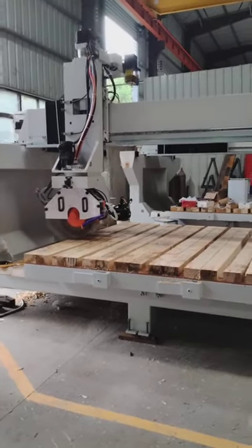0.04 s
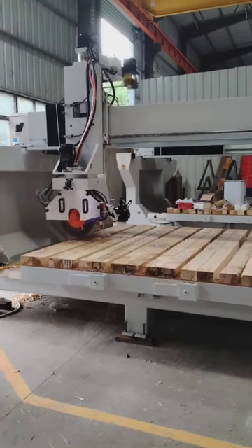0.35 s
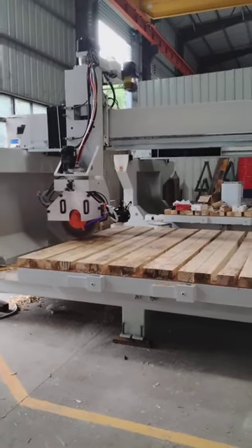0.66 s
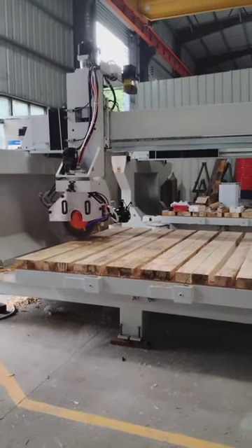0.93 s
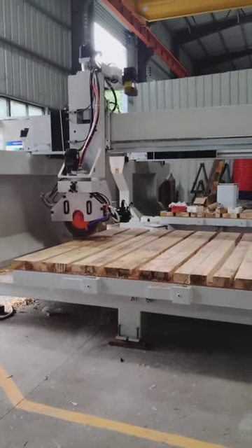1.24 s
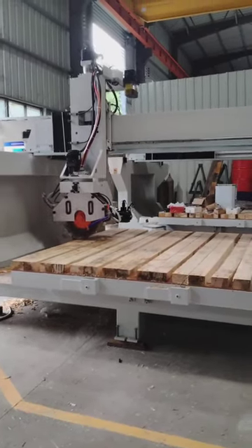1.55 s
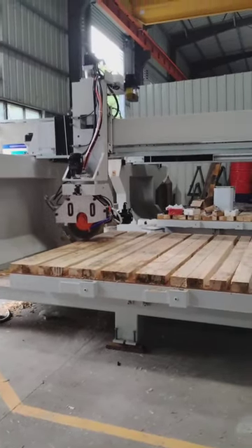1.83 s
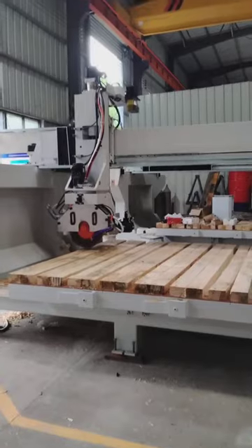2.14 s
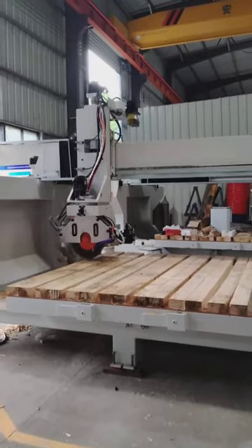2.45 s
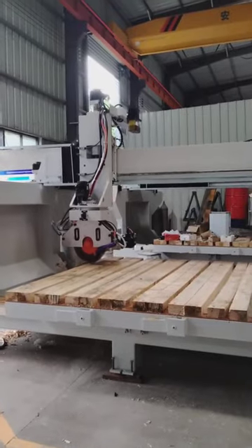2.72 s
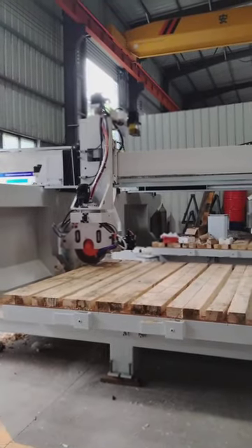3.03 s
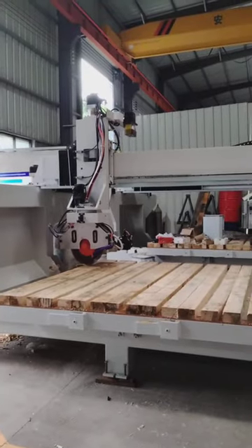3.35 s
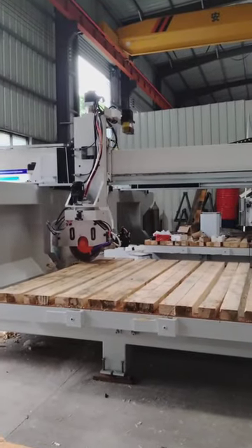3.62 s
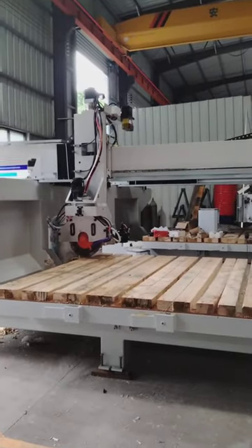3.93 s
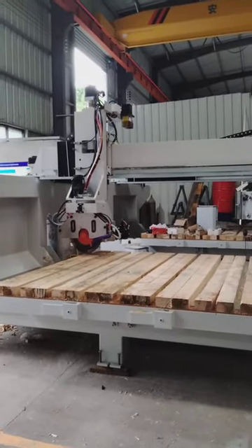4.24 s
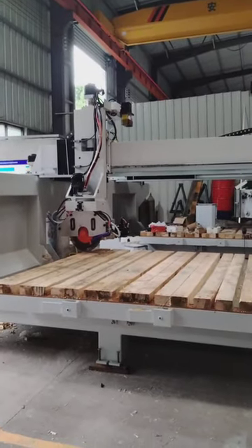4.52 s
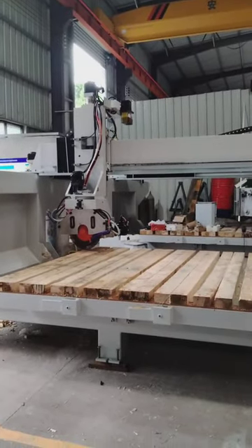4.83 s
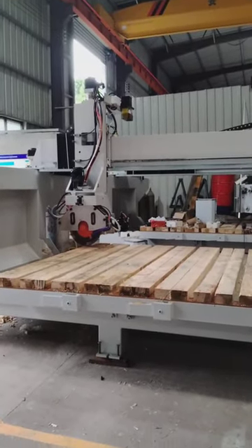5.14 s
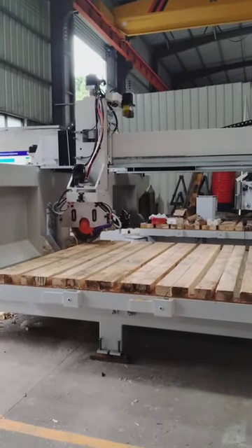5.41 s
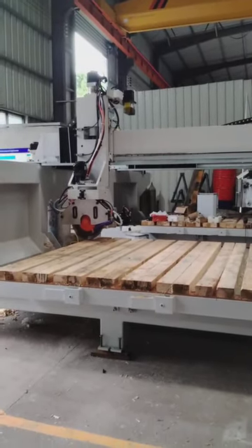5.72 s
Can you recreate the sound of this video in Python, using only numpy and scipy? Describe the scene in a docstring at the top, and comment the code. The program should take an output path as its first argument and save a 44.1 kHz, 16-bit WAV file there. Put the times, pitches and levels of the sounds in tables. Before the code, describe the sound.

A high electric whine, a ringing steel whir and broad hissing air come from a big saw spinning without cutting. The whine wavers quickly at first, then more slowly as the microphone, a few steps away, moves and settles. Early on a deep, distant thud reverberates through the factory hall and the hiss drops a little. A faint low rumble and hum continue throughout.

```python
"""A high, wavering whine, a steady whir and hissing air: a stone bridge saw idles in a large factory hall. The
inverter-fed motor whines in lines whole supply steps apart; its random switching rings the stator into a whir.
The lines fade and swell as the listener, a few steps away, moves slowly through the hall's standing waves. The
hiss eases after the first second, as something heavy thuds far off. The hall hums and rumbles behind."""
import sys
import numpy as np
from scipy import signal
from scipy.fft import rfft, irfft
from scipy.io import wavfile

SR = 44100
rng = np.random.default_rng(int(sys.argv[2]) if len(sys.argv) > 2 else 0)


def unload_audio(sound):
    """Save the sound as a 16-bit wav file, at the path given as the first command line argument."""
    columns = np.transpose(np.atleast_2d(sound))
    # keep every value between -1 and 1, then stretch to whole-number steps
    steps = np.round(np.clip(columns, -1, 1) * 32767)
    wavfile.write(sys.argv[1], SR, steps.astype(np.int16))


N = 254456
T = np.arange(N) / SR
BINS_HZ = np.maximum(np.arange(N // 2 + 1) * SR / N, 1)

CARRIER_HZ, SUPPLY_HZ = 2662.9, 50
LOWER_WHINE_HZ, UPPER_WHINE_HZ = CARRIER_HZ - 5 * SUPPLY_HZ, CARRIER_HZ + 5 * SUPPLY_HZ
LOWER_WHINE_GAIN_DB, UPPER_WHINE_GAIN_DB = 0.2, -0.5
WHIR_DB, WHIR_FLUTTER_DB, WHIR_FLUTTER_HZ = -21.5, 1.12, 22
AIR_FLUTTER_DB, AIR_FLUTTER_HZ = 0.55, 26
RUSH_DB, RUSH_FLOW_SHARE = -39, 0.26
HISS_GAIN_DB, SIZZLE_GAIN_DB, SIZZLE_DB_PER_S = -0.44, -8, -0.03
THUD_S, REVERB_LAG_S = 0.945, 0.07
LOW_DRONE_HZ, HIGH_DRONE_HZ = 302, 899.7
RUMBLE_GAIN_DB, LOW_DRONE_GAIN_DB, HIGH_DRONE_GAIN_DB = 4, 2, 1.5

# Listener steps about, then almost stops. Each row: time in seconds, pace from 0 to 1.
LISTENER_PACE = [(2.6, 1), (4.3, 0.25)]
# Standing-wave crests and nulls of the upper whine. Each row: time in seconds, relative level in dB.
UPPER_WHINE_DB = [(0.02, -29), (0.08, -52), (0.14, -27), (0.27, -27.5), (0.42, -20), (0.5, -22),
                  (0.58, -52), (0.65, -21.5), (0.77, -21), (0.9, -52), (1.01, -28.5), (1.09, -52),
                  (1.15, -48), (1.24, -22), (1.38, -52), (1.52, -29), (1.61, -52), (1.75, -22.8),
                  (2.02, -48), (2.18, -34), (2.28, -48), (2.39, -29), (2.6, -39), (2.72, -35), (2.86, -26),
                  (2.98, -31), (3.11, -27.5), (3.28, -48), (3.65, -23.5), (3.8, -21.3), (3.98, -26.5),
                  (4.09, -44), (4.21, -27), (4.37, -56), (4.55, -29.5), (5.0, -26), (5.35, -25.5),
                  (5.7, -27)]
# Lower whine, fading and growing stronger. Each row: time in seconds, relative level in dB.
LOWER_WHINE_DB = [(0.05, -30), (0.2, -39), (0.38, -29), (0.55, -42), (0.68, -30), (0.84, -44), (0.97, -29),
                  (1.07, -27.5), (1.15, -38), (1.42, -24), (1.6, -32), (1.98, -41), (2.3, -31),
                  (2.48, -23.5), (2.71, -32), (2.98, -28), (3.25, -20), (3.42, -26), (3.9, -25),
                  (4.28, -22.5), (4.55, -25), (4.66, -19.8), (4.85, -24), (4.97, -21.3), (5.15, -22.3),
                  (5.28, -29), (5.42, -21.5), (5.55, -24.5), (5.67, -20), (5.76, -27)]
# Weaker motor lines. Each row: carrier multiple, offset in supply steps, start and end levels in dB.
MOTOR_SIDEBANDS = [(1, -13, -52, -41.5), (1, -3, -52, -43), (1, -2, -39, -32), (1, 0, -38, -53),
                   (1, 2, -50, -47), (1, 3, -39.5, -55), (2, -19, -61, -62), (2, -14, -52, -45.5),
                   (2, -2, -56, -48.3), (2, 3, -59, -53)]
# Stator resonances. Each row: centre in Hz, width in Hz, relative level in dB, # change in dB per second as the
# listener moves.
STEEL_MODES = [(2384, 178, 1, 0), (2468, 154, -10.5, 1.38), (2640, 266, -4, -0.73), (2760, 52, -25, 1.9),
               (2233, 114, -5.5, -1.24), (2210, 800, -11.5, 0), (3210, 1270, -20, 0)]
# Air flow, hard at first, then steady. Each row: time in seconds, relative level in dB.
FLOW_DB = [(0.05, -27.5), (0.38, -28), (0.49, -29.5), (0.63, -26.5), (0.77, -28.5), (0.9, -27), (1.01, -29),
           (1.16, -28), (1.5, -33), (1.61, -30.5), (2.05, -31), (2.13, -32), (3.75, -32), (4.0, -31.5),
           (5.65, -31.5)]
# Spectra of blade rush, hiss and its bright top. Each row: frequency in Hz, relative density in dB.
RUSH_SPECTRUM = [(60, -16), (480, -0.5), (640, -3.5), (790, -2), (880, 1.5), (1150, 3), (1280, 0),
                 (1430, 5), (1650, -8), (2000, -5), (4000, -29.5)]
HISS_SPECTRUM = [(400, -25), (2500, 3.5), (3400, 6.5), (3780, 2), (4200, 8), (4530, 4.5), (4800, 6.5),
                 (5350, 3.5), (6100, 5.5), (7000, 4.5), (7800, 6.5), (8600, 10), (9500, 6), (10300, -8.5),
                 (12000, -15.5)]
SIZZLE_SPECTRUM = [(6000, -42), (9500, 8), (10300, 5), (11600, 3), (12700, 4), (13600, 0), (14500, -12)]
# Spectra of the thud, its reverberation and the rumble. Each row: frequency in Hz, relative density in dB.
BOOM_SPECTRUM = [(30, -40), (60, -23), (85, -5), (115, 2), (170, -7), (230, -8), (330, -18), (900, -46)]
REVERB_SPECTRUM = [(60, -18), (110, -3.5), (160, -1), (220, -2), (300, -11), (420, -8), (560, -8),
                   (900, -38)]
RUMBLE_SPECTRUM = [(15, -26), (30, -18), (42, -21), (70, 0), (125, 1), (200, 0.5), (330, -4), (450, -2),
                   (640, -26.5), (1200, -28.5)]
# Swells of the hall's rumble and drones. Each row: time in seconds, relative level in dB.
RUMBLE_DB = [(0.5, -51), (2.0, -49.5), (2.7, -47.5), (3.1, -50.5), (3.65, -47), (4.3, -51), (5.4, -50.5)]
LOW_DRONE_DB = [(0.8, -57), (1.45, -53.5), (1.8, -48.5), (2.25, -51), (3.2, -54), (3.7, -51.5),
                (4.2, -56.5), (4.8, -53), (5.2, -58)]
HIGH_DRONE_DB = [(0.1, -56), (2.0, -63), (2.7, -54), (3.05, -48.5), (3.55, -51), (3.95, -68), (4.3, -54),
                 (5.5, -52)]
# Motor and transformer hum. Each row: frequency in Hz, level in dB.
HUM_LINES = [(50, -65), (100, -66), (347, -60), (500, -59), (600, -61)]


def motor_whine():
    """Switching ripple in the motor field: carrier sidebands, the loudest five supply steps either side."""
    upper = standing_wave(UPPER_WHINE_DB) * tone(UPPER_WHINE_HZ, scatter=0.02, fade_hz=0.47)
    lower = standing_wave(LOWER_WHINE_DB) * tone(LOWER_WHINE_HZ, scatter=0.24, fade_hz=14.0)
    out = from_db(UPPER_WHINE_GAIN_DB) * upper + from_db(LOWER_WHINE_GAIN_DB) * lower
    for multiple, steps, start_db, end_db in MOTOR_SIDEBANDS:
        hz = multiple * CARRIER_HZ + steps * SUPPLY_HZ
        out += from_db(np.linspace(start_db, end_db, N)) * tone(hz, scatter=0.4, fade_hz=3.0)
    return out


def steel_whir():
    """Random switching of the inverter keeps the motor's stator ringing; each resonance flutters on its own."""
    out = 0
    for hz, width_hz, db, db_per_s in STEEL_MODES:
        resonance = 1 / (1 + (2 * (BINS_HZ - hz) / width_hz) ** 2)
        level_db = db + db_per_s * T + WHIR_FLUTTER_DB * drift(WHIR_FLUTTER_HZ)
        out = out + from_db(level_db) * np.sqrt(width_hz) * noise(resonance)
    return from_db(WHIR_DB) * rms_one(out)


def air():
    """The blade fans a soft rush; it eases with the flow, as do a broad hiss and its bright top."""
    flow_db = curve(FLOW_DB) + AIR_FLUTTER_DB * drift(AIR_FLUTTER_HZ)
    rush_db = RUSH_DB + RUSH_FLOW_SHARE * (flow_db - flow_db.mean())
    rush = from_db(rush_db) * hollow(noise(colour(RUSH_SPECTRUM)))
    hiss = from_db(flow_db + HISS_GAIN_DB) * noise(colour(HISS_SPECTRUM))
    sizzle_db = flow_db + SIZZLE_GAIN_DB + SIZZLE_DB_PER_S * T + drift(corner_hz=22)
    sizzle = from_db(sizzle_db) * noise(colour(SIZZLE_SPECTRUM))
    return rush + hiss + sizzle


def hollow(rush, at_s=1.8, width_s=0.5, centre_hz=714, width_hz=260, dip_db=-2.5):
    """One lower-middle band of the rush sinks and returns."""
    band = irfft(rfft(rush) * np.exp(-((BINS_HZ - centre_hz) / width_hz) ** 2), N)
    depth = np.exp(-((T - at_s) / width_s) ** 2)
    return rush + (from_db(dip_db * depth) - 1) * band


def far_thud():
    """A far, heavy blow: a short deep boom, then the hall's higher reverberation swells and dies away."""
    def swell(start_s, gain_db, rise_s, t60_s):
        age_s = np.maximum(T - start_s, 0)
        return from_db(gain_db - 60 * age_s / t60_s) * (1 - np.exp(-age_s / rise_s))
    boom = swell(THUD_S, gain_db=-31, rise_s=0.045, t60_s=0.89)
    reverb = swell(THUD_S + REVERB_LAG_S, gain_db=-27.8, rise_s=0.115, t60_s=1.38)
    return boom * noise(colour(BOOM_SPECTRUM)) + reverb * noise(colour(REVERB_SPECTRUM))


def hall():
    """Fans and far machines blur into a rumble, with hum, a rough low drone and a clearer high one."""
    hum = sum(from_db(db) * tone(hz, scatter=0.52, fade_hz=1.2) for hz, db in HUM_LINES)
    low_gain = from_db(curve(LOW_DRONE_DB) + LOW_DRONE_GAIN_DB)
    low_drone = low_gain * tone(LOW_DRONE_HZ, scatter=1.4, fade_hz=21)
    high_gain = from_db(curve(HIGH_DRONE_DB) + HIGH_DRONE_GAIN_DB)
    high_drone = high_gain * tone(HIGH_DRONE_HZ, scatter=0.3, fade_hz=4.0)
    rumble = from_db(curve(RUMBLE_DB) + RUMBLE_GAIN_DB) * noise(colour(RUMBLE_SPECTRUM))
    return rumble + hum + low_drone + high_drone


def standing_wave(rows):
    """Gain of a line in standing waves: linear in pressure from crest to null, so nulls are narrow."""
    times_s, db = np.transpose(rows)
    return np.interp(T, times_s, from_db(db))


def tone(hz, scatter, fade_hz):
    """A line plus reflections that shift as the listener moves; fade_hz holds at full pace. Unit rms."""
    walked = np.cumsum(curve(LISTENER_PACE))
    reflections = np.interp(walked, np.arange(N), drift(fade_hz) + 1j * drift(fade_hz))
    turns = np.cumsum(hz * np.ones(N)) / SR + rng.random()
    return rms_one(np.real((1 + scatter * reflections) * np.exp(2j * np.pi * turns)))


def drift(corner_hz):
    """Slow random wander: coarse noise through a double one-pole low-pass. Unit rms."""
    hop, warmup = 40, 2000
    pole = np.exp(-2 * np.pi * corner_hz * hop / SR)
    white = rng.standard_normal(N // hop + warmup + 2)
    slow = signal.lfilter([1], [1, -2 * pole, pole * pole], white)[warmup:]
    return np.interp(np.arange(N) / hop, np.arange(len(slow)), rms_one(slow))


def noise(bin_gain):
    """Spectrally shaped turbulence. Unit rms."""
    return rms_one(irfft(rfft(rng.standard_normal(N)) * bin_gain, N))


def colour(spectrum):
    """Gain per bin, interpolated in dB over log frequency."""
    hz, db = np.transpose(spectrum)
    return from_db(np.interp(np.log(BINS_HZ), np.log(hz), db))


def curve(rows):
    """A time table's value at every sample."""
    times_s, values = np.transpose(rows)
    return np.interp(T, times_s, values)


def from_db(db):
    """Decibels to gain."""
    return 10 ** (np.asarray(db) / 20)


def rms_one(x):
    """Scale to unit rms."""
    return x / np.sqrt(np.mean(np.abs(x) ** 2) + 1e-20)


def scene():
    """Saw and hall, mono."""
    return (motor_whine() + steel_whir() + air() + hall() + far_thud())[None]


def record(dry):
    """Steep elliptic low-pass."""
    cutoff_hz = 14050
    return signal.sosfilt(signal.ellip(12, .1, 90, cutoff_hz, fs=SR, output="sos"), dry)


dry = scene()
out = record(dry)
unload_audio(out)
```